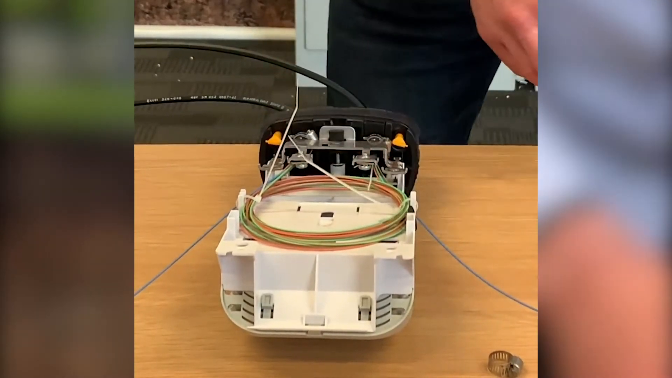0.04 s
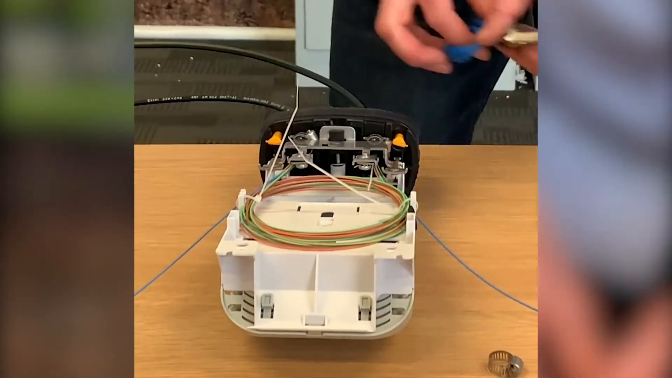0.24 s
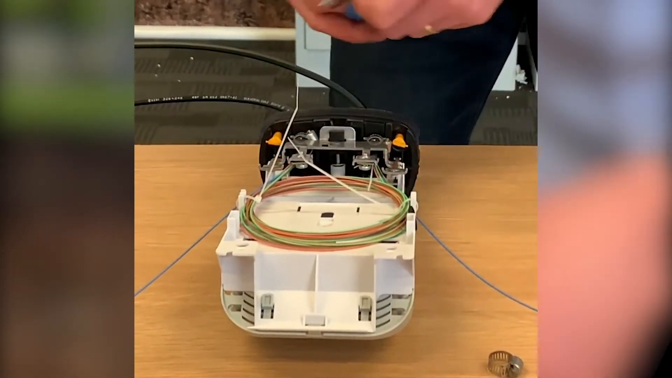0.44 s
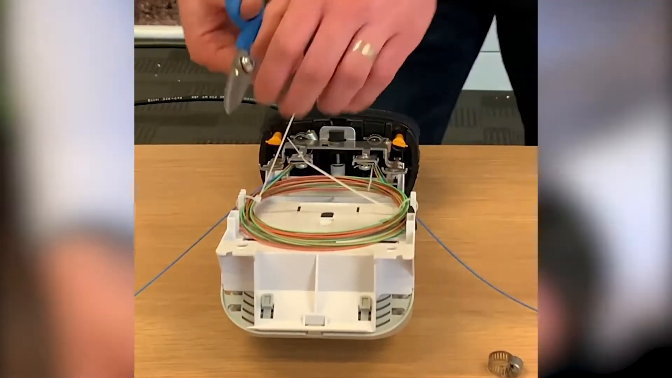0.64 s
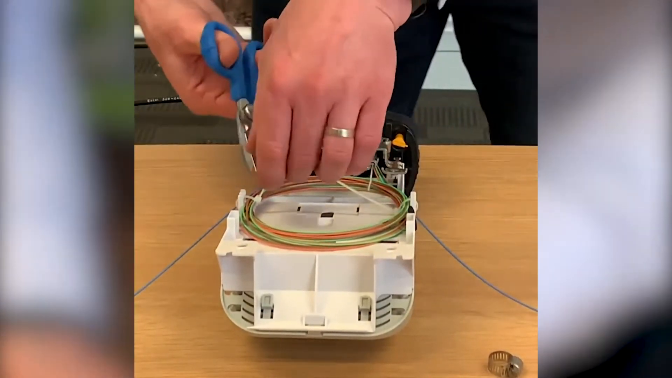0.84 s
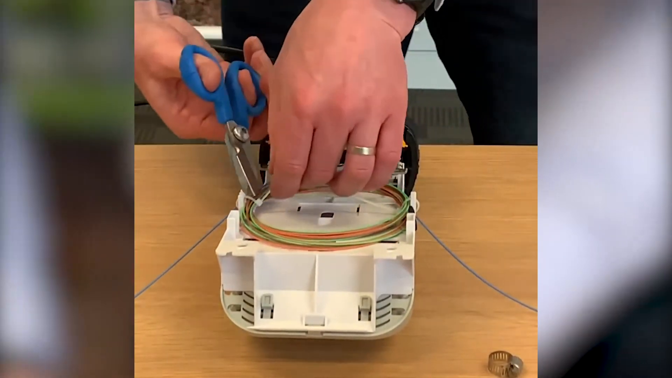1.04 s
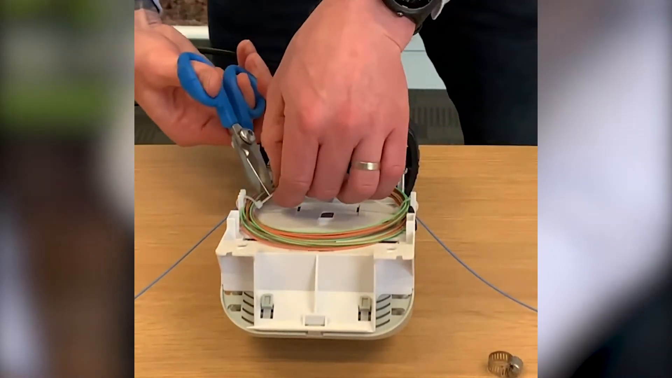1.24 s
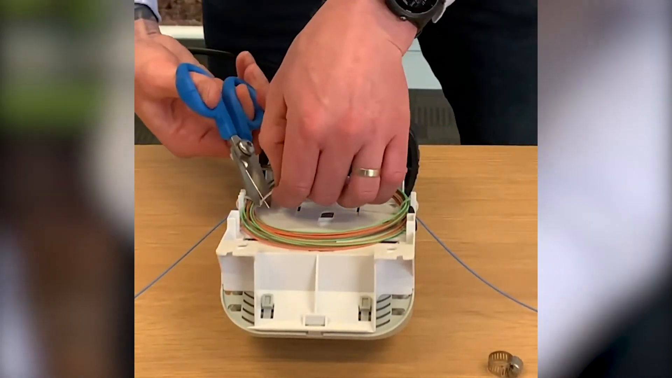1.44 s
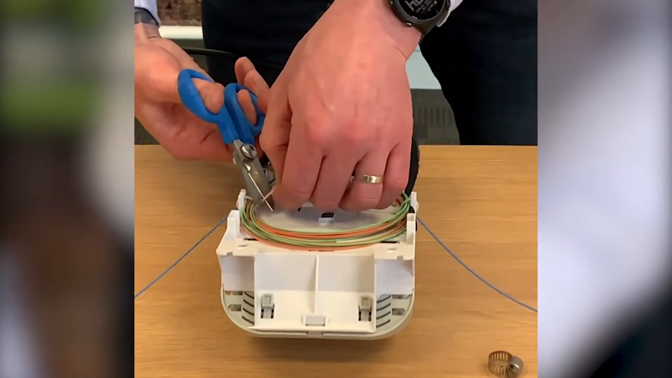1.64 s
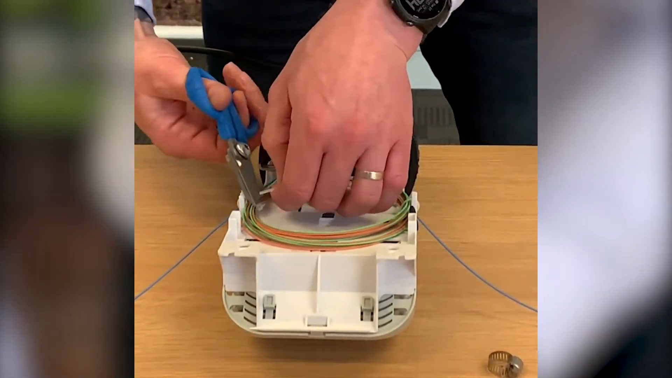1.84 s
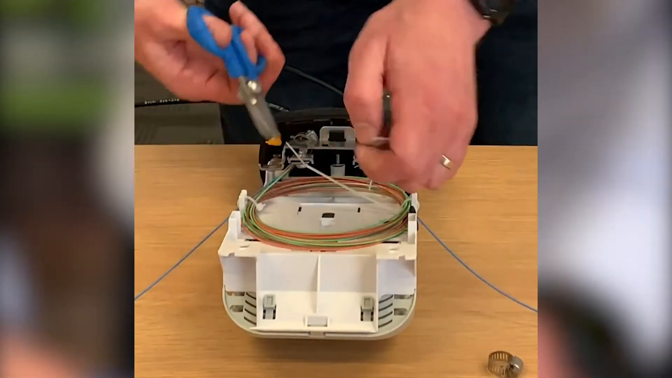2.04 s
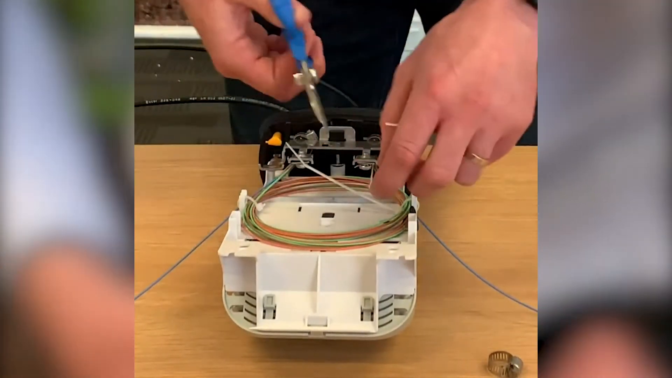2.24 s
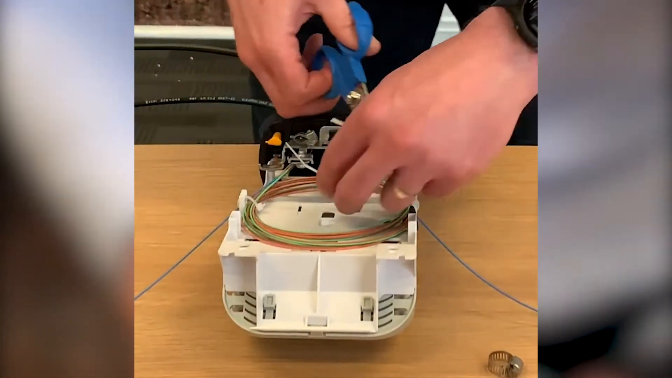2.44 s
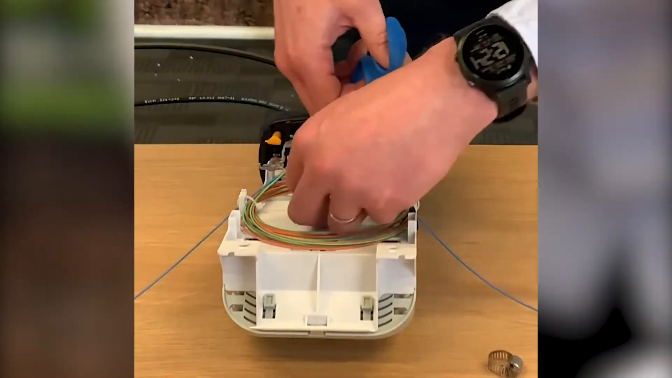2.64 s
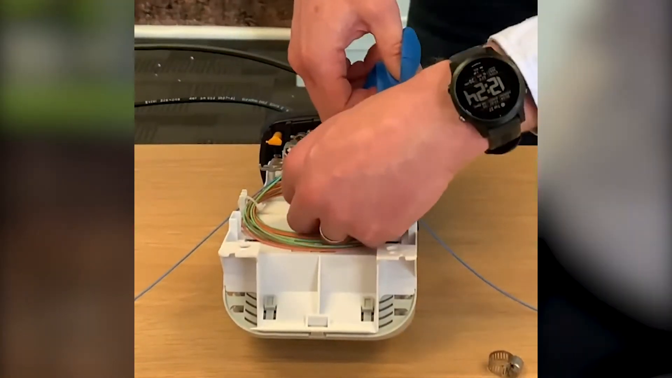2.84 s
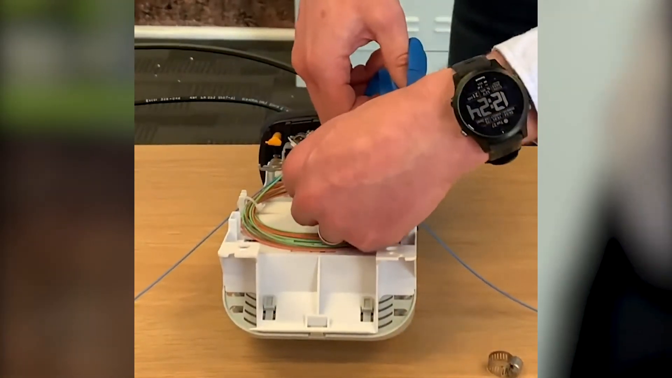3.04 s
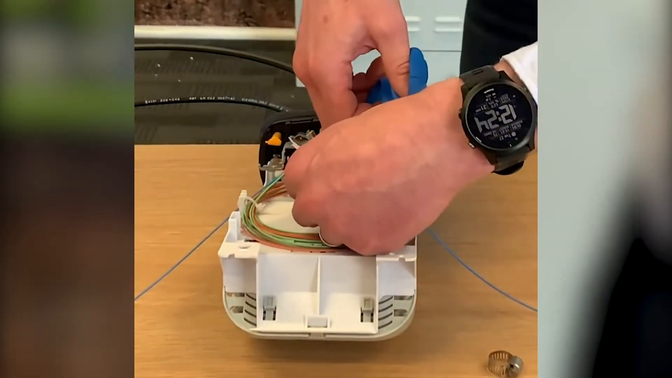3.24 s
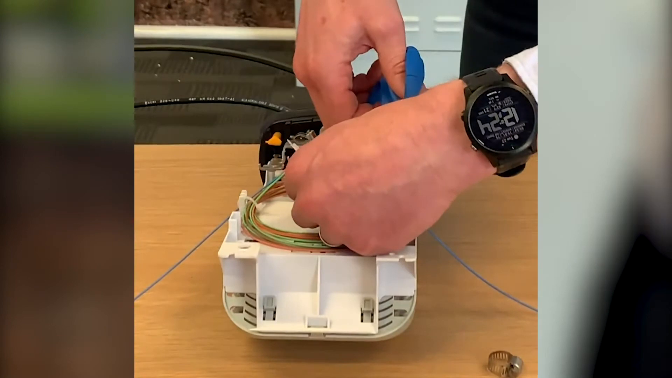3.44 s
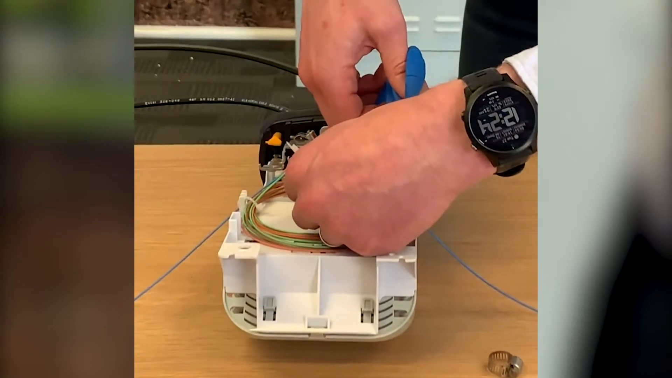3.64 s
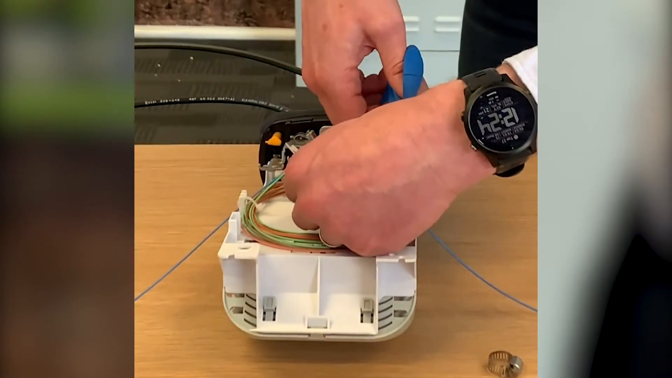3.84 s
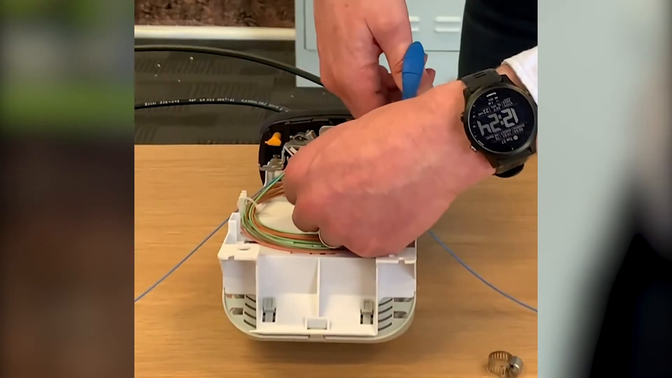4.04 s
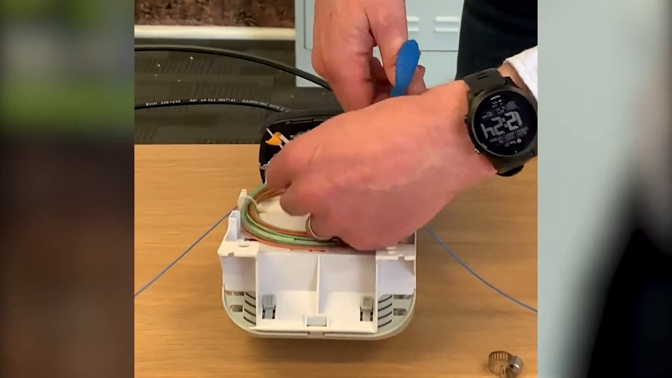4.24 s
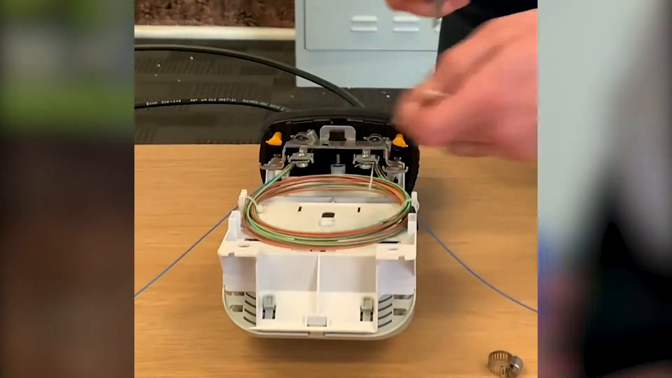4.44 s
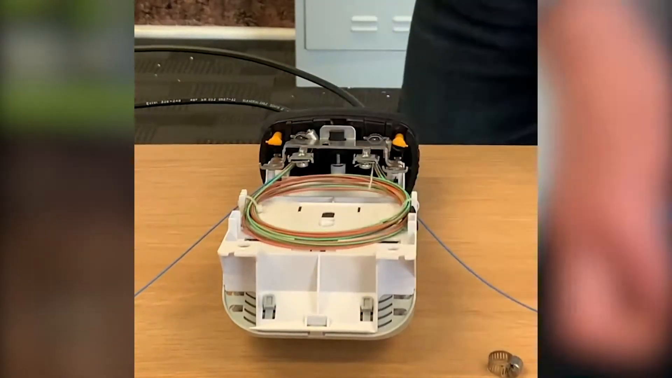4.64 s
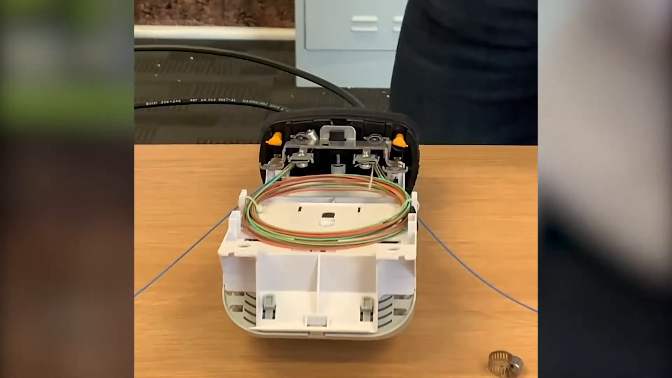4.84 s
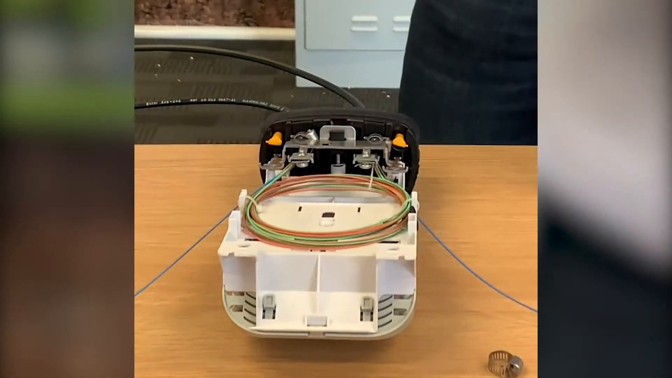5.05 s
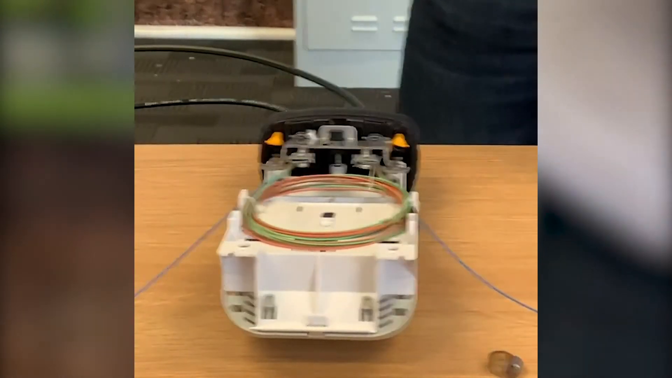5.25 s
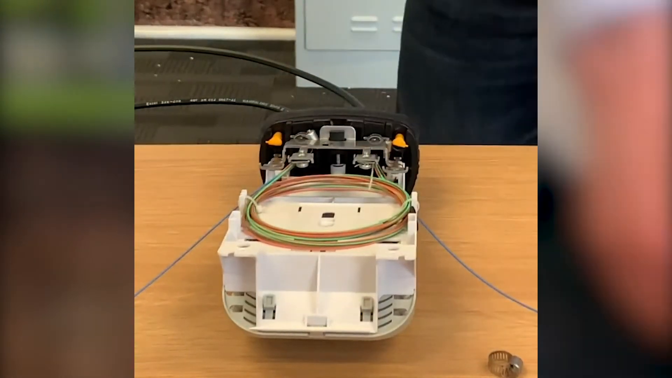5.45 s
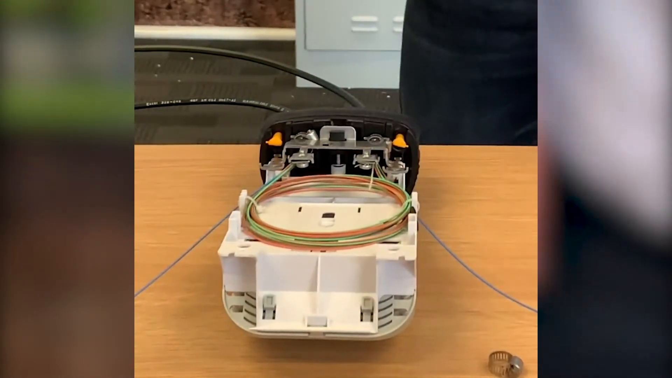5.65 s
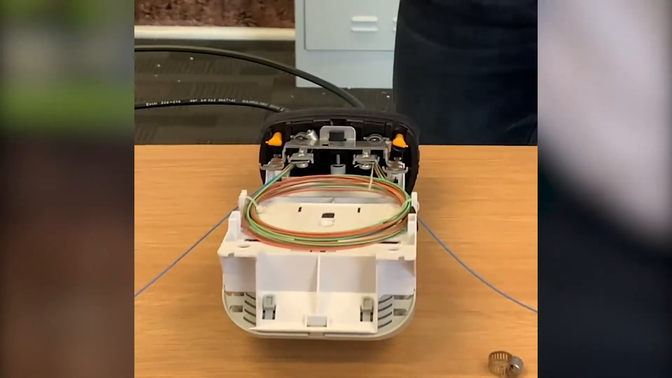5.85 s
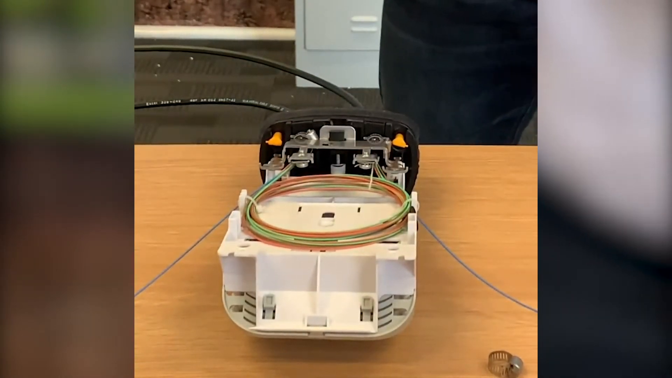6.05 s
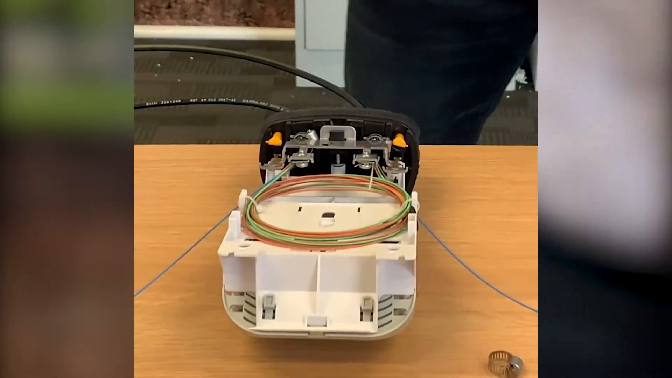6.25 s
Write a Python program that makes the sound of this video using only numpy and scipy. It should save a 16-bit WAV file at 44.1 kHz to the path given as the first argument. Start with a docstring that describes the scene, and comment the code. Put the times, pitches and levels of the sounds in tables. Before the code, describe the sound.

Close stereo pickup of handwork at a table in a small, lightly reverberant room, over a soft low fan rush. After a knock's tail come faint ticks and a piercing snip, then sleeve strokes and small thuds on a plastic housing. Another sharp snip makes the housing bump. A quiet pause with cloth rustle ends in a rapid, heavy clatter of steel cutters put down.

```python
"""A knock dies away in a quiet ventilated room; steel cutters then snip two nylon cable ties off a fibre loop.
Blades tick against the ties in a plastic tray, sleeves rub, the housing rocks on the table after the second snip.
At the end the cutters are put down on a table close by and clatter to rest.
Contacts are filtered noise bursts and clicks, steel and table top are dying sines, cloth and air are coloured
noise, fan tones are wavering sines, and the room is a decaying noise tail."""
import sys
import numpy as np
from scipy import signal
from scipy.fft import rfft, irfft, next_fast_len
from scipy.io import wavfile
from scipy.ndimage import uniform_filter1d

SR = 44100
rng = np.random.default_rng(int(sys.argv[2]) if len(sys.argv) > 2 else 0)


def unload_audio(sound):
    """Save the sound as a 16-bit wav file, at the path given as the first command line argument."""
    columns = np.transpose(np.atleast_2d(sound))
    # keep every value between -1 and 1, then stretch to whole-number steps
    steps = np.round(np.clip(columns, -1, 1) * 32767)
    wavfile.write(sys.argv[1], SR, steps.astype(np.int16))


N = 278271
TIME_S = np.arange(N) / SR
TAIL = 32768  # samples per burst
TAIL_TIME_S = np.arange(TAIL) / SR
EDGE_HZ = 15900
PORT_LAG_S = .000158  # the tray's sound reaches the right port later

# In all spectra the level is relative; bass, treble, ring and room columns are levels too.
# Ventilation noise per Hz: [f/Hz, level/dB]
AIR_SPECTRUM = [(20, -23.5), (33, -13.5), (48, 2.5), (65, -1), (110, -1.5), (170, -8.5), (240, -16),
                (310, -16), (400, -27), (720, -36.5), (1100, -31.5), (1600, -45), (3000, -52.5),
                (11000, -57.5), (16000, -76.5)]
# Fan tones: [f/Hz, rms level/dB]
FAN_TONES = [(63, -59.5), (237, -77), (291, -68)]
# Cloth on cloth, per Hz: [f/Hz, level/dB]
CLOTHES_SPECTRUM = [(300, -8.5), (800, 4.5), (1800, 1.5), (3500, -10), (7500, -10.5), (10000, -15.5),
                    (12500, -8), (16000, -30)]
# Clothes rustle as an arm reaches in or draws back: [t/s, length/s, level/dB]
REACHES = [(-.25, 1.09, -76), (.5, 0.68, -77), (2.3, 1.17, -70.5), (4.4, 0.84, -71), (5.28, 0.43, -71.5),
           (5.55, 1.14, -72)]
# Cloth on plastic, per Hz: [f/Hz, level/dB]
SLEEVE_SPECTRUM = [(200, 4.5), (420, 1), (760, -5.5), (1000, 0.5), (1400, -6.5), (2200, -5.5),
                   (3500, -11.5), (6500, -20.5), (9500, -27), (13000, -29.5), (16000, -44.5)]
# Sleeve strokes over the housing: [t/s, length/s, level/dB]
SLIDES = [(.34, 0.12, -71), (.885, .1, -67), (2.30, 0.25, -70), (2.565, 0.15, -58.5), (2.62, 0.39, -71.5),
          (2.825, 0.38, -50.5)]
# Room decay: [f/Hz, t60/s]
ROOM_DECAY = [(150, 0.45), (400, 0.5), (1000, 0.4549), (2800, 0.3579), (7000, 0.35), (13000, 0.18)]
# Room return: [f/Hz, level/dB]
ROOM_RETURN = [(100, 0), (500, 3), (2000, 5), (7000, 5.5), (13000, -5)]
# Left-right likeness, sound from all sides: [f/Hz, likeness/1]
DIFFUSE_LIKENESS = [(60, .93), (130, 0.98), (290, 0.61), (640, 0.093), (1400, 0), (15000, 0.0068)]
# Left-right likeness, sound from close by: [f/Hz, likeness/1]
NEAR_LIKENESS = [(100, 1), (250, 0.99), (500, 0.56), (1500, 0.95), (3000, 0.56), (8000, 0.23)]
# Hard tools knock on the table: [t/s, level/dB, bass/dB, treble/dB, table ring/dB, room/dB]
KNOCKS = [(0, -13.5, -7.5, 10.5, -18.5, 2), (5.6353, 4, 3.5, 8.5, 1.5, -7.5), (5.6516, 10, 3, 11, 7.5, -3),
          (5.7853, 7.5, 10.5, 1, 2.5, -2.5), (5.836, 8, -4, 6, 3.5, -6), (5.8824, 4, -4, 5.5, 2.5, -9),
          (5.9098, 4, 3.5, 5.5, 0.5, -7.5), (6.1406, -33, -3, 0, -36, -5)]
# Blow on the table: [f/Hz, level/dB]
KNOCK_SPECTRUM = [(50, -17.5), (92, -9), (160, -3), (290, -10), (420, -1.5), (700, -8.5), (950, -5),
                  (1400, -10), (1800, -6), (2400, -14), (3400, -24), (4700, -41.5), (7200, -46),
                  (11000, -61), (16000, -65.5)]
# Decay of the blow: [f/Hz, t60/s]
KNOCK_DECAY = [(100, 0.34), (500, 0.21), (1200, 0.16), (2500, 0.0083), (5000, 0.035), (12000, 0.021)]
# Table-top modes: [f/Hz, level/dB, t60/s]
TABLE_MODES = [(95, -3, .4), (156, -6, .3), (236, -10, .28), (397, 1, .25), (411, -4, .22), (503, -1, .25),
               (611, -4, .22), (753, -6, .28), (869, -2, .2), (949, -1, .19), (1105, -7, .2),
               (1178, -5, .18), (1213, -5, .2), (1292, -7, .2), (1366, -7, .15), (1614, -6, .2),
               (1795, -4, .2)]
# Housing nudged and rocking on the table: [t/s, level/dB, bass/dB, treble/dB]
BUMPS = [(1.8522, -23, -11, 1), (2.6042, -19.5, -3, -3), (2.634, -28.5, -8, 2.5), (2.684, -26, -12, -10),
         (2.777, -12, 17, -8), (4.2271, -1, 7, -4.5), (4.3291, -3, 1, 11.5)]
# Hollow plastic housing: [f/Hz, level/dB]
HOUSING_SPECTRUM = [(50, -21), (110, -6.5), (190, 9.5), (270, -3.5), (420, -3.5), (540, -5), (800, -16.5),
                    (1400, -21), (3000, -33), (9000, -50), (16000, -76)]
# Blades and tie tails touch the tray: [t/s, level/dB, bass/dB, treble/dB]
TICKS = [(1.019, -46.5, -7, -10), (1.242, -44.5, -3, -13), (1.4444, -31.5, 4.5, -8), (1.4518, -28, 3, 3),
         (1.5503, -34, 13, -9), (1.5735, -35, 3, -15), (2.6845, -29.5, 15.5, -29), (2.7755, -25, 0, -21),
         (3.216, -40, 0, -1.5), (3.331, -38, -12, -7.5), (3.35, -34, -15, -9), (4.0388, -28.5, 6, 5),
         (4.739, -41, -3.5, 6.5), (6.2804, -24.5, -4, -4), (6.3045, -38.5, 15, -3)]
# Light contact: [f/Hz, level/dB]
TICK_SPECTRUM = [(200, -22.5), (750, -10.5), (1200, 3), (1450, -7), (1800, -0.5), (2300, -3), (2800, -6.5),
                 (3800, -0.5), (4700, -11), (5600, -7), (6800, -3), (9500, -16), (13000, -10.5),
                 (16000, -28)]
# A tie parts, the blades slam shut: [t/s, level/dB, bass/dB, treble/dB, steel ring re snip/dB]
SNIPS = [(1.8503, 8.5, -5.5, 5.5, -0.5), (4.1914, 8, 2.5, 4, -5.5)]
# Crack of breaking nylon: [f/Hz, level/dB]
SNAP_SPECTRUM = [(150, -14), (450, -11), (800, -18), (1150, -10.5), (1700, -9), (2300, -12.5),
                 (3100, -13.5), (4300, -17), (5400, -13), (7000, -3.5), (9100, -11), (10800, -4),
                 (12900, -3.5), (14200, -10.5), (16000, -23)]
# Modes of the closed blades: [f/Hz, level/dB, t60/s]
STEEL_MODES = [(6550, -1.5, .3), (6808, -2.5, 0.4), (6899, -3, .3), (6996, -5, 0.28), (7400, -6.5, .25),
               (12500, -2, .17)]


def amp(db):
    """Decibels to gain."""
    return 10 ** (np.asarray(db) / 20)


def read(points, hz):
    """Interpolates a table on a log-frequency axis."""
    f, value = np.transpose(points)
    return np.interp(np.log(hz + 1), np.log(f + 1), value)


def unit(x):
    """Scales to a mean energy of one per channel."""
    energy = np.mean(np.sum(x ** 2, axis=-1))
    return x / np.sqrt(energy + 1e-30)


def add(mix, start_s, sound):
    """Mixes a sound in at its start time."""
    part = mix[:, max(round(start_s * SR), 0):][:, :sound.shape[-1]]
    part += sound[..., :part.shape[1]]


def pair(size, likeness):
    """Frequencies and spectra of white noise at two partly alike ports."""
    hz = np.fft.rfftfreq(size, 1 / SR)
    common, apart = rfft(rng.standard_normal((2, size)))
    c = np.clip(read(likeness, hz), -1, 1)
    sign = np.array([[1], [-1]])
    return hz, common * np.sqrt((1 + c) / 2) + sign * apart * np.sqrt((1 - c) / 2)


def hiss(spectrum, likeness):
    """Steady coloured noise of rms one."""
    hz, z = pair(next_fast_len(N + N % 2), likeness)
    noise = irfft(z * amp(read(spectrum, hz)))[:, :N]
    return unit(noise) * np.sqrt(N)


def dying(decay, likeness):
    """Countless close modes: octave bands of noise, white in energy, each with its own decay."""
    hz, z = pair(TAIL, likeness)
    centres_hz = np.geomspace(62.5, 16000, 9)
    total = 0
    for share, f in zip(np.eye(len(centres_hz)), centres_hz):
        band = irfft(z * read(np.c_[centres_hz, share], hz))
        total = total + band * unit(amp(-60 * TAIL_TIME_S / read(decay, f)))
    return unit(total)


def colour(x, spectrum, bass_db, treble_db):
    """Minimum-phase filter of unit energy; soft contacts favour the bass, hard ones the treble."""
    hz = np.fft.rfftfreq(TAIL, 1 / SR)
    tilt = [(500, bass_db), (1500, 0), (6000, treble_db), (13000, 1.4 * treble_db)]
    db = read(spectrum, hz) + read(tilt, hz)
    # each struck spot favours some close resonances over others
    db += np.interp(hz, np.geomspace(300, 16000, 110), 2.4 * rng.standard_normal(110))
    log_gain = np.log(amp(np.r_[db, db[-2:0:-1]]))
    taps = np.fft.ifft(np.exp(signal.hilbert(log_gain).conj())).real[:4096]
    return signal.fftconvolve(x, unit(taps)[None], axes=1)[:, :TAIL]


def ring(modes, rise_s=0.00079):
    """Dying sines with new random phases at each strike, slightly apart between the ports."""
    phases = rng.uniform(0, 2 * np.pi, (len(modes), 1, 1))
    phases = phases + 0.5 * rng.standard_normal((len(modes), 2, 1))
    sines = 0
    for (hz, db, t60_s), phase in zip(modes, phases):
        decay = amp(db - 60 * TAIL_TIME_S / t60_s)
        sines = sines + decay * np.sin(2 * np.pi * hz * TAIL_TIME_S + phase)
    return unit(sines * (1 - np.exp(-TAIL_TIME_S / rise_s)))


def click(lag_s=0):
    """One sharp band-limited impulse, later at the right port by the lag."""
    n = np.arange(TAIL) - 8
    return np.array([np.sinc(n - d) * np.exp(-((n - d) / 6) ** 2) for d in (0, lag_s * SR)])


def even(x):
    """Flattens a burst's broad spectrum, so that the struck body sets its colour."""
    z = rfft(x)
    power = uniform_filter1d(np.mean(abs(z) ** 2, 0), size=600)
    return unit(irfft(z / np.sqrt(power + 1e-12)))


def walls(gap_s):
    """The room's diffuse answer: silent for half the gap, then building up over one gap."""
    hz = np.fft.rfftfreq(TAIL, 1 / SR)
    tail = irfft(rfft(dying(ROOM_DECAY, DIFFUSE_LIKENESS)) * amp(read(ROOM_RETURN, hz)))
    return tail * np.clip(TAIL_TIME_S / gap_s - .5, 0, 1)


def in_room(x, echo):
    """Evened direct sound plus its echo, faded out together."""
    return (even(x) + echo) * signal.windows.tukey(2 * TAIL, .4)[TAIL:]


def ventilation(air_db=-50.5, waver_rad=0.53):
    """Low rush of air as coloured noise, with faint fan tones of wandering phase."""
    out = amp(air_db) * hiss(AIR_SPECTRUM, DIFFUSE_LIKENESS)
    for hz, db in FAN_TONES:
        drift = uniform_filter1d(rng.standard_normal(N), size=9000, mode="wrap")
        drift = uniform_filter1d(drift, size=5000, mode="wrap")
        phase = waver_rad * unit(drift) * np.sqrt(N)
        out = out + amp(db) * np.sqrt(2) * np.sin(2 * np.pi * hz * TIME_S + phase)
    return out


def rub(strokes, spectrum, speed_law, rest_db, grain_db):
    """Cloth friction: hiss that catches and slips within milliseconds and swells with stroke speed."""
    catch = unit(uniform_filter1d(rng.standard_normal(N), size=300)) * np.sqrt(N)
    power = amp(rest_db) ** 2
    for start_s, length_s, db in strokes:
        speed = np.sin(np.pi * np.clip((TIME_S - start_s) / length_s, 0, 1)) ** 2
        power = power + (amp(db) * speed ** abs(speed_law)) ** 2
    return np.sqrt(power) * amp(grain_db * catch) * hiss(spectrum, DIFFUSE_LIKENESS)


def knocks(click_db=-12):
    """Handles land dull, blades bright: click plus dying noise; each blow rings the table top."""
    out, echo = np.zeros((2, N)), walls(gap_s=0.0073)
    for start_s, db, bass_db, treble_db, table_db, room_db in KNOCKS:
        blow = amp(click_db) * click() + dying(KNOCK_DECAY, NEAR_LIKENESS)
        heard = in_room(blow, amp(room_db) * echo)
        add(out, start_s, amp(db) * colour(heard, KNOCK_SPECTRUM, bass_db, treble_db))
        add(out, start_s, amp(table_db) * ring(TABLE_MODES))
    return out


def bumps(low_t60_s=0.072, high_t60_s=.05, room_db=-6):
    """Dull, hollow thuds of the housing: dying noise, slower in the lows."""
    out, echo = np.zeros((2, N)), amp(room_db) * walls(gap_s=0.021)
    for start_s, db, bass_db, treble_db in BUMPS:
        thud = dying([(200, low_t60_s), (1500, high_t60_s)], NEAR_LIKENESS)
        heard = in_room(thud, echo)
        add(out, start_s, amp(db) * colour(heard, HOUSING_SPECTRUM, bass_db, treble_db))
    return out


def ticks(t60_s=0.037, click_db=-12, room_db=-3):
    """Light contacts of steel and nylon: a click and noise, damped almost at once."""
    out, echo = np.zeros((2, N)), amp(room_db) * walls(gap_s=0.0068)
    for start_s, db, bass_db, treble_db in TICKS:
        contact = amp(click_db) * click(PORT_LAG_S) + dying([(1000, t60_s)], NEAR_LIKENESS)
        heard = in_room(contact, echo)
        add(out, start_s, amp(db) * colour(heard, TICK_SPECTRUM, bass_db, treble_db))
    return out


def snips(crack_t60_s=.0065, rise_s=0.0006, scatter_t60_s=0.014, scatter_db=-12, room_db=-2, ring_db=-21):
    """Nylon breaks within a millisecond; the crack scatters round the tray and the steel rings on."""
    out = np.zeros((2, N))
    hz, snap_db = np.transpose(SNAP_SPECTRUM)
    blade_band = np.exp(-((hz - 6700) / 1500) ** 2)
    decay = amp(-60 * TAIL_TIME_S / crack_t60_s)
    scatter = amp(scatter_db - 60 * TAIL_TIME_S / scatter_t60_s)
    force = (1 - np.exp(-TAIL_TIME_S / rise_s)) * (decay + scatter)
    for start_s, db, bass_db, treble_db, steel_db in SNIPS:
        burst = force * rng.choice([-1, 1], TAIL)
        crack = signal.fftconvolve(click(PORT_LAG_S), burst[None], axes=1)[:, :TAIL]
        heard = in_room(crack, amp(room_db) * walls(gap_s=0.008))
        spectrum = np.c_[hz, snap_db + steel_db * blade_band]
        add(out, start_s, amp(db) * colour(heard, spectrum, bass_db, treble_db))
        add(out, start_s, amp(db + steel_db + ring_db) * ring(STEEL_MODES))
    return out


def scene():
    """Handwork over the room's air; cloth and air lean slightly left."""
    clothes = rub(REACHES, CLOTHES_SPECTRUM, speed_law=0.58, rest_db=-87.5, grain_db=0.8)
    sleeve = rub(SLIDES, SLEEVE_SPECTRUM, speed_law=0.93, rest_db=-95.5, grain_db=0.4)
    balance_db = [[.4], [-.4]]
    background = (ventilation() + clothes + sleeve) * amp(balance_db)
    return background + knocks() + bumps() + ticks() + snips()


def record(dry):
    """Clips at full scale, then limits the band with a linear-phase low-pass."""
    held = np.clip(dry, -1, 1)
    low_pass = signal.firwin(255, EDGE_HZ, window=("kaiser", 9), fs=SR)
    return signal.oaconvolve(held, low_pass[None], "same")


dry = scene()
out = record(dry)
unload_audio(out)
```